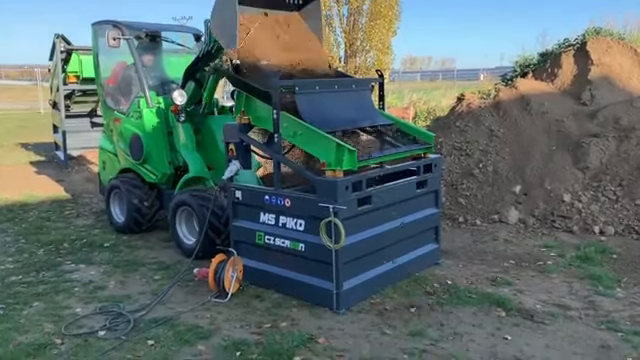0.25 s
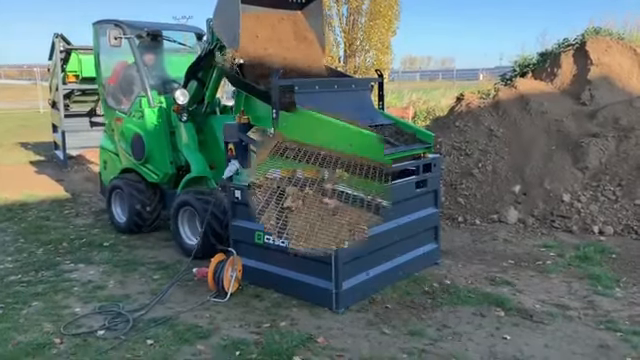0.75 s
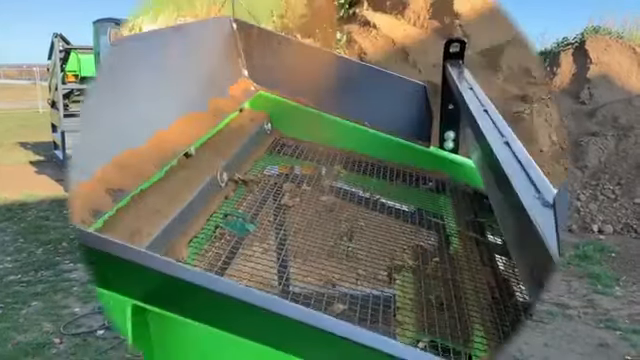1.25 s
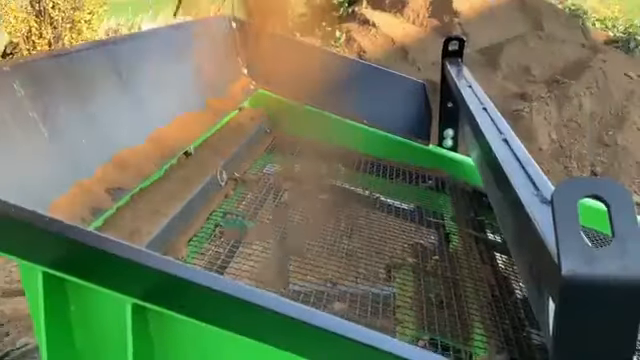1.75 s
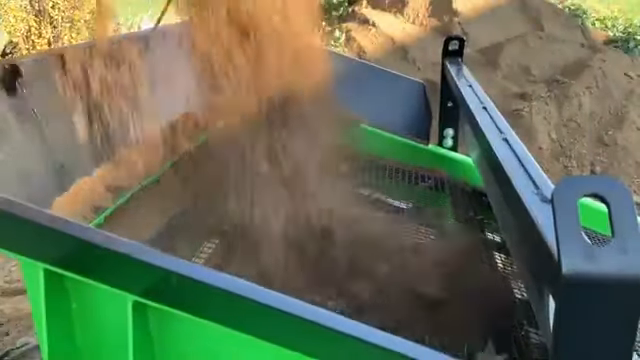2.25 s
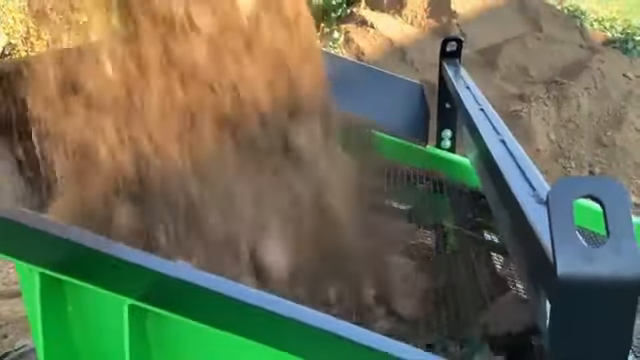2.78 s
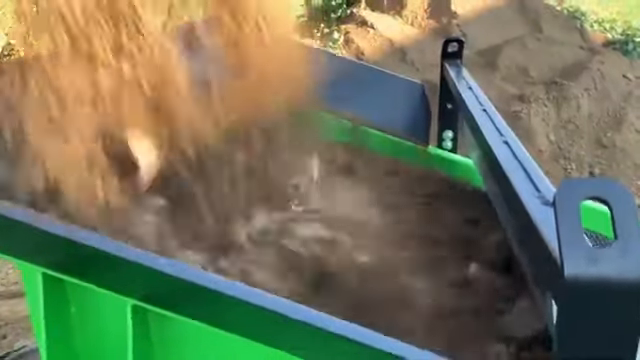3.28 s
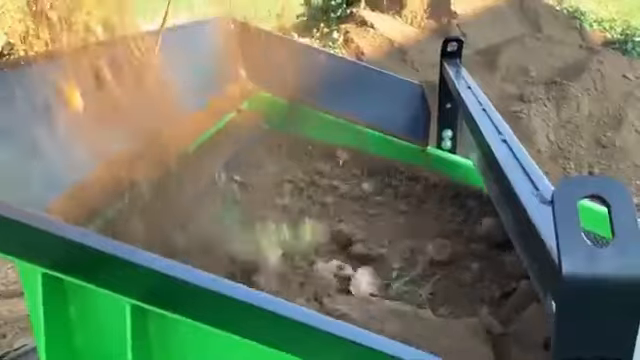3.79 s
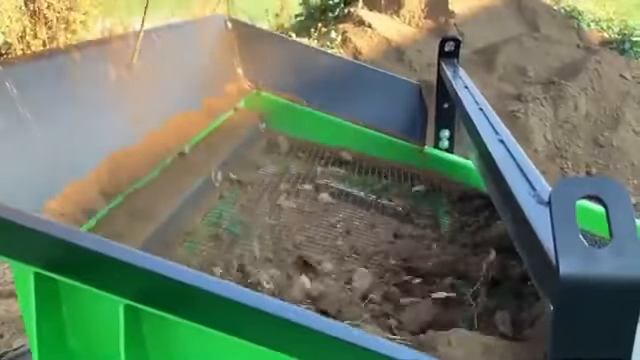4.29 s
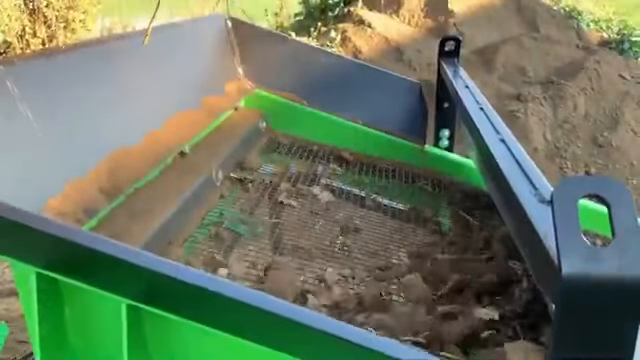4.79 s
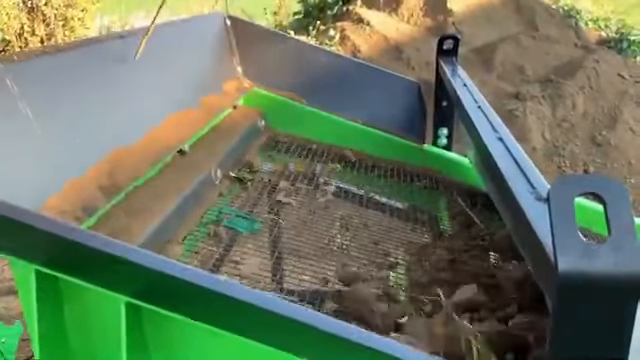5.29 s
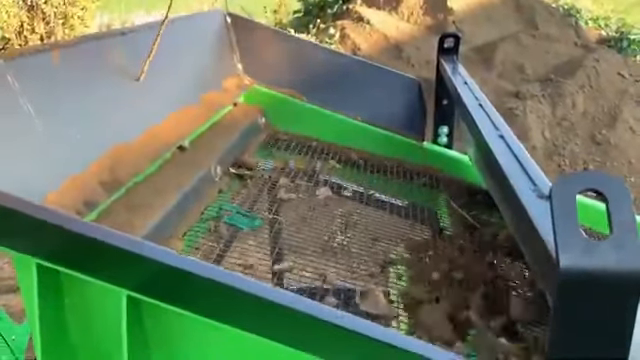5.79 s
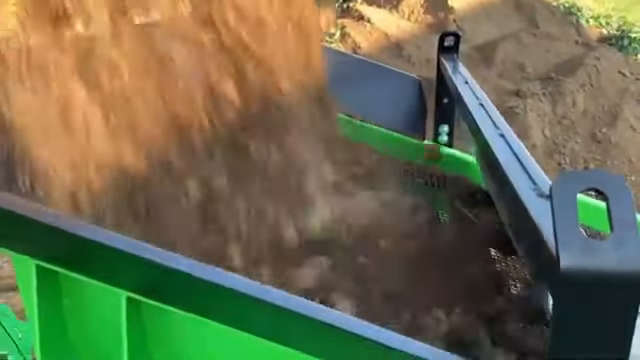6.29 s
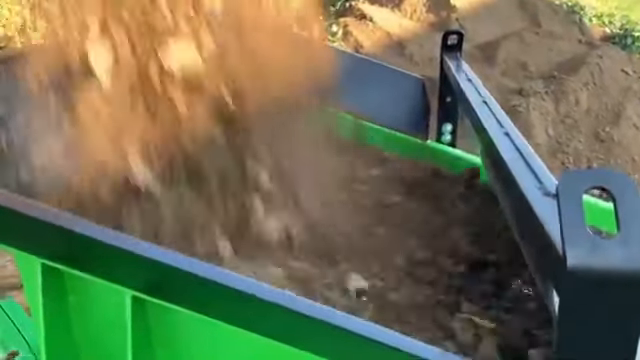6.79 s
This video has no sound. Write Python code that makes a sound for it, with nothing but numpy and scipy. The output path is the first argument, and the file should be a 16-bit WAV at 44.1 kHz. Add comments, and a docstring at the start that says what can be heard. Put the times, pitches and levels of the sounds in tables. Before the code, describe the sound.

Outdoors, a small diesel engine and a vibrating screen drone from a distance with a muffled clatter. The sound crossfades to a close, wide stereo view: stronger engine, fast shaker buzz, then a sharp stone crack as soil pours in a gritty rush. It thins to pebbles rattling on mesh, then a second load crashes down.

```python
"""A diesel drones across a field, then a close view fades in: soil pours and pebbles ring on a vibrating screen.
A compact loader's diesel drones beside it, built from orders of the engine cycle. A shaker motor throws the
load up over 24 times a second; shaped noise makes soil and rumble, decaying sines and resonances the ringing
pebbles and wires, noise bursts the stones and clods. Two microphone ports hear the treble a moment apart."""
import sys
import numpy as np
from scipy import signal
from scipy.fft import rfft, irfft
from scipy.io import wavfile
from scipy.ndimage import uniform_filter1d

SR = 44100
rng = np.random.default_rng(int(sys.argv[2]) if len(sys.argv) > 2 else 0)


def ratio_of_db(decibels):
    """Turn decibels (scalar or array-like) into linear amplitude factors; 0 dB maps to 1."""
    return 10 ** (np.asarray(decibels, float) / 20)


def to_wav(s):
    """Save 16-bit WAV."""
    ch = np.atleast_2d(s).T  # columns
    pcm = np.round(np.clip(ch, -1, 1) * 32767)  # PCM
    wavfile.write(sys.argv[1], SR, pcm.astype(np.int16))


N = 310905
T = np.arange(N) / SR
HZ = np.fft.rfftfreq(N, 1 / SR)


def unit(x):
    """Scaled to rms 1."""
    return x / np.sqrt(np.mean(x ** 2))


def columns(table):
    """Each column of a time table as a curve, straight between its rows."""
    time_s, *rest = np.transpose(table)
    return [np.interp(T, time_s, column) for column in rest]


def along(points):
    """A (Hz, value) table over all frequencies, straight on a log frequency scale."""
    hz, value = np.transpose(points)
    return np.interp(np.log(HZ + 1), np.log(hz), value)


def colour(x, points):
    """Filter by a table of (Hz, dB)."""
    return irfft(rfft(x) * ratio_of_db(along(points)), N)


def walk(rate):
    """Random levels held 1 / rate seconds and slewed twice; spread near 1."""
    hold = int(SR / rate)
    steps = np.repeat(rng.standard_normal(N // hold + 1), hold)
    return 1.3 * uniform_filter1d(uniform_filter1d(steps, hold), hold)[:N]


def fall(x, t60_s):
    """Every impulse becomes an exponential tail, 60 dB down after t60_s."""
    return signal.lfilter([1], [1, -np.exp(-np.log(1000) / (t60_s * SR))], x)


def grains(per_second, spread_db):
    """Random impacts, many small and few large."""
    chance, size = rng.random((2, N))
    size_db = np.minimum(-spread_db * np.log(1 - size), 3 * spread_db)
    return (chance < per_second / SR) * ratio_of_db(size_db)


def air():
    """Three unrelated noises: the direct path and two scattered ones."""
    return rng.standard_normal((3, N))


# likeness of the two microphone ports: hz, share (0-1)
PORT_LIKENESS = [(60, 0.92), (250, 0.82), (600, 0.91), (1200, 0.13), (1700, 0.3), (4000, 0.09),
                 (6000, 0.24), (7200, 0.77), (10500, 0.9), (11700, 1), (15000, 0.9)]
TREBLE_LAG_S, TURN_HZ = .000217, 6400


def ports(x, bass_lag_s, pan_db):
    """Row 0 is direct sound, reaching one port first; rows 1 and 2 are the scattered sound of left and right."""
    # below the turn the left port leads, above it the right; a positive pan favours the left
    lag_s = np.where(HZ < TURN_HZ, bass_lag_s, -TREBLE_LAG_S)
    like = np.clip(along(PORT_LIKENESS), 0, 1)
    side = np.array([[1], [-1]])
    direct, *scattered = rfft(x)
    arriving = np.sqrt(like) * direct * np.exp(1j * np.pi * HZ * lag_s * side)
    around = np.sqrt(1 - like) * np.array(scattered)
    return irfft(arriving + around, N) * ratio_of_db(side * pan_db / 2)


# how distance recolours the noise heard across the field: hz, gain_db
DISTANCE = [(100, 5), (200, -2.5), (500, 2), (1000, 9.5), (1500, 4), (3000, 6.5), (6000, 0.5),
            (10000, -1.5), (15000, -2)]


def across_field(noise):
    """Distance recolours the noise of the screen."""
    return colour(noise, DISTANCE)


def tone(hz, db):
    """A steady line that wavers a little in level and phase."""
    level = ratio_of_db(db + 1.5 * walk(18))
    phase = 2 * np.pi * np.cumsum(hz + 0 * T) / SR
    return np.sqrt(2) * level * np.cos(phase + 0.65 * walk(13))


# hum of the screen frame from afar: multiple of the shaker turn, level_db
FRAME_HUM = [(3, -39.5), (4, -56), (5, -40), (12, -41)]
FAR_SHAKE_HZ, FAR_THROW_S = 24.4, .041  # turns a second, time of one upward throw


def frame_hum():
    """The screen frame hums on multiples of the shaker turn."""
    return sum(tone(multiple * FAR_SHAKE_HZ, db) for multiple, db in FRAME_HUM)


# load on the engine lifts its upper orders: time_s, lift_db (in full from the 18th order up)
LOAD = [(1.2, 2), (2.75, -3.5), (3.3, -2), (4.7, 4.5), (5.3, 0.6), (7.05, 1.2)]


def engine(firing_hz, db, orders):
    """Orders of the four-stroke cycle, locked to the crank; load lifts the upper ones."""
    load_db, = columns(LOAD)
    cycle = 2 * np.pi * np.cumsum(firing_hz / 3) / SR  # three cylinders fire in each cycle
    out = 0
    for order, order_db, waver_db in orders:
        waver_db = min(waver_db, 1.8)
        lift_db = load_db * min(order / 3 - 1, 5) / 5
        level = ratio_of_db(order_db + waver_db * walk(14) + lift_db)
        # the exhaust pipe holds even multiples back further, which skews each pulse
        lag_rad = .8 if order % 2 else 1.9
        slip_rad = .08 * waver_db * walk(12)
        out = out + level * np.cos(order * cycle - lag_rad + slip_rad)
    return np.sqrt(2) * ratio_of_db(db) * out


# engine from across the field: time_s, firing rate (hz), level_db
FAR_ENGINE = [(0, 43.98, -21), (.25, 44.1, -21), (.37, 45, -25.5), (1.1, 44.3, -20.5)]
# its orders: multiple of the cycle, relative level_db, waver_db (1.8 at most is used)
FAR_ORDERS = [(3, -16, 2), (6, -0.5, -1), (9, -7, 3.5), (12, -17, 5.5), (15, -24, 3), (18, -21.5, 5)]


def far_engine():
    """The three-cylinder diesel drones on the orders of its cycle, every third being a firing multiple."""
    return engine(*columns(FAR_ENGINE), FAR_ORDERS)


# engine from close by: time_s, firing rate (hz)
NEAR_ENGINE = [(1.2, 55.64), (1.6, 55.2), (2.55, 55.67), (2.8, 56.06), (3.2, 55.6), (3.55, 56.37),
               (3.9, 55.3), (4.6, 55.28), (6.2, 55.3), (6.6, 55.45), (7.05, 55.8)]
# its orders: multiple of the cycle, relative level_db, waver_db (1.8 at most is used)
NEAR_ORDERS = [(3, 0, 0.096), (6, -5, 0.66), (9, -9.5, 1.84), (11, -18.5, 4.5), (12, -29, 3),
               (15, -25.5, 3), (18, -13.5, 1.9), (22, -26.5, 0.92), (27, -28, 3), (36, -26.5, 0.88)]
NEAR_ENGINE_DB = -17.5


def near_engine(firing_hz):
    """The diesel close by, with orders between the firing multiples too."""
    return engine(firing_hz, NEAR_ENGINE_DB, NEAR_ORDERS)


WHINE_PER_FIRING = 13.55
WHINE_ON_S, WHINE_RISE_S, WHINE_DB, WHINE_IDLE_DB = 5.47, 0.33, -38, -47


def pump_whine(firing_hz):
    """The hydraulic pump turns with the engine and whines louder as the bucket tips."""
    whine_db = np.interp(T, [WHINE_ON_S, WHINE_ON_S + WHINE_RISE_S], [WHINE_IDLE_DB, WHINE_DB])
    return tone(WHINE_PER_FIRING * firing_hz, whine_db)


# heaps landing at once: start_s, swell_db over the steady clatter (about 0.69 of it is reached)
HEAPS = [(1.49, 12), (5.4, 2), (6.17, 2)]
HEAP_RISE_S, HEAP_FALL_S = 0.06, .1


def heaps():
    """Each heap swells the clatter quickly and lets it die away, in dB."""
    out = 0
    for start_s, db in HEAPS:
        age = np.maximum(T - start_s, 0)
        out = out + db * 2 * (1 - np.exp(-age / HEAP_RISE_S)) * np.exp(-age / HEAP_FALL_S)
    return out


# two separate levels on the screen: time_s, soil pouring (control db), clods clattering (control db)
SOIL = [(0, -8.5, -11), (1.1, -14.5, -14), (1.5, -3.5, -5.5), (2.0, -1, 0), (2.2, 4.5, 3), (2.5, 4, 3.5),
        (2.85, 3, 1.5), (3.05, 0, -1.5), (3.8, -0.5, -1), (4.2, -4, 1), (4.8, -4, 1.5), (5.1, -9.5, 0.5),
        (5.95, -7, 0.5), (6.2, 5.5, 5.5), (6.6, 1.5, 1), (7.05, 0.5, 2)]


def soil_flow():
    """How strongly soil pours and clods clatter; each layer follows one of them by its own slope."""
    pour_db, clatter_db = columns(SOIL)
    return pour_db, clatter_db + heaps()


def throw(turn_hz, throw_s, sharpness):
    """How hard the load lands during each turn of the shaker, mean 1."""
    turn = (T - throw_s) * turn_hz % 1
    beat = np.exp(-turn * sharpness) * (1 - np.exp(-turn * 30))
    return beat / beat.mean()


# colour of the rumble: hz, db per Hz
RUMBLE = [(25, -28), (45, -7.5), (80, -2.5), (140, 0.5), (290, 0), (450, -12), (800, -17), (1500, -41.5)]
RUMBLE_DB, RUMBLE_SLOPE = -23, 0.51  # dB at rest, dB per dB of clatter


def rumble(clatter_db):
    """Low noise of engine and frame, wavering in level."""
    noise = colour(air(), RUMBLE) * ratio_of_db(0.88 * walk(16))
    return ratio_of_db(RUMBLE_DB + RUMBLE_SLOPE * clatter_db) * unit(noise)


# colours of pouring soil and of its dust: hz, db per Hz
HISS = [(1500, -12), (3000, 1), (4500, -1), (6500, -0.5), (8500, 0), (10500, -1.5), (11500, -9),
        (15500, -35)]
DUST = [(8000, -16), (11500, -13), (13000, 2), (15500, 2)]
HISS_DB, HISS_SLOPE = -35.5, 0.84  # dB at rest, dB per dB of pouring
DUST_DB, DUST_SLOPE = -44, 1.4


def hiss(pour_db, beat, lumps, sway_db, pings):
    """Soil pours on the mesh: noise swollen by the beat, lumps and grit; dust is its topmost treble."""
    grit = fall(grains(200 * beat, 3.), .02)
    power = 1.6 + 1.2 * beat + 0.042 * lumps ** 2 + 0.43 * grit ** 2
    noise = air() * np.sqrt(power) * ratio_of_db(sway_db + walk(18)) + ratio_of_db(-9) * pings
    soil = ratio_of_db(HISS_DB + HISS_SLOPE * pour_db) * unit(colour(noise, HISS))
    return soil + ratio_of_db(DUST_DB + DUST_SLOPE * pour_db) * unit(colour(noise, DUST))


# colour of thudding clods: hz, db per Hz
THUD = [(250, -16.5), (450, -2.5), (700, -7.5), (1000, -7.5), (1500, -20.5), (3000, -46.5)]
THUD_DB, THUD_SLOPE = -28, 1.21  # dB at rest, dB per dB of clatter


def thud(clatter_db, lumps, sway_db, pings):
    """Clods thud on the deck: dull noise that swells with each lump."""
    noise = air() * np.sqrt(1 + 0.13 * lumps ** 2) * ratio_of_db(0.13 * sway_db + 1.5 * walk(27))
    return ratio_of_db(THUD_DB + THUD_SLOPE * clatter_db) * unit(colour(noise + ratio_of_db(-2.5) * pings, THUD))


# resonances of wires and frame: pitch_hz, width_hz (30 at least is used), relative level_db
MESH = [(433, 25, -6), (665, 110, -6), (909, 25, 3), (1293, 49, 6), (1760, 93, -17), (2082, 14, 1.5),
        (2566, 80, 1), (3470, 190, 6.5), (4060, 110, -2)]


def mesh(knocks):
    """Each resonance of the mesh rung by its own share of the knocks."""
    out = 0
    for (hz, width_hz, db), knock in zip(MESH, knocks):
        pole = np.exp((2j * np.pi * hz - np.pi * max(width_hz, 30)) / SR)
        out = out + ratio_of_db(db) * signal.lfilter([1], [1, -pole], knock).imag
    return out


# colour of the rattling load: hz, db per Hz
RATTLE = [(500, -26), (1000, -12.5), (1330, 2.5), (1600, -1), (2200, -2), (2650, -5), (2850, -11.5),
          (5000, -14), (9000, -61)]
RATTLE_DB, RATTLE_SLOPE = -30.5, 1.04  # dB for the noise at rest, dB per dB of clatter


def rattle(clatter_db, beat, lumps, sway_db, pings):
    """The load rattles on the deck in time with the shaker, and its grains ring the wires."""
    power = 0.77 + 0.089 * beat + 0.043 * lumps ** 2
    noise = air() * np.sqrt(power) * ratio_of_db(sway_db + walk(22)) + ratio_of_db(-8.5) * pings
    wires = mesh([[grains(130 * beat, 2.) for _ in range(3)] for _ in MESH])
    deck = unit(colour(noise, RATTLE)) + ratio_of_db(-7) * unit(wires)
    return ratio_of_db(RATTLE_DB + RATTLE_SLOPE * clatter_db) * deck


def pebbles(beat, count):
    """Pebbles of all sizes ping on the wires, each at its own pitch, mostly as the deck throws them."""
    draw = rng.random((count, 7))
    out = np.zeros((3, N + SR))
    starts = np.searchsorted(np.cumsum(beat) / beat.sum(), draw[:, 0])
    for start, (_, pitch, ring, size, *turn) in zip(starts, draw):
        hz = 350 * 2 ** (5.2 * pitch)
        t60_s = (0.04 + 0.11 * ring) * (1000 / hz) ** 0.47  # higher pings die sooner
        age = np.arange(int(t60_s * 0.5 * SR)) / SR
        shape = (1 - np.exp(-age / 0.003)) * 1000 ** (-age / t60_s)
        gain = hz ** .7 * ratio_of_db(min(-3 * np.log(1 - size), 6))
        # each path has its own starting phase
        ping = np.sin(2 * np.pi * (hz * age + np.array(turn)[:, None]))
        out[:, start:start + len(age)] += gain * shape * ping
    return unit(out[:, :N])


def screen(beat):
    """The working screen: its layers draw on one set of lumps, pings and slow swaying."""
    pour_db, clatter_db = soil_flow()
    lumps = fall(grains(200 * beat, 2.), .05)
    sway_db = .5 * walk(9) + 1.1 * walk(20)
    pings = pebbles(beat, count=7000)
    return (rumble(clatter_db) + hiss(pour_db, beat, lumps, sway_db, pings)
            + thud(clatter_db, lumps, sway_db, pings) + rattle(clatter_db, beat, lumps, sway_db, pings))


# big clods: start_s, relative thump_db
CLODS = [(1.5148, -12), (1.5594, -17), (1.6534, -18), (2.069, -6.5), (2.795, -9), (4.2812, -30),
         (4.6533, -21), (5.431, -10), (5.819, -23), (6.1094, -18), (6.2101, -8), (6.2394, -18)]
CLOD_T60_S = 0.29


def clods():
    """Big clods thump slowly and dully, and knock the mesh."""
    thump, knocks = np.zeros(N), np.zeros((len(MESH), 3, N))
    shares = rng.standard_normal((len(CLODS), len(MESH), 3))
    for (start_s, thump_db), share in zip(CLODS, shares):
        age = np.maximum(T - start_s, 0)
        thump += ratio_of_db(thump_db) * (1 - np.exp(-age / 0.0039)) * 1000 ** (-age / CLOD_T60_S)
        knocks[:, :, int(start_s * SR)] = ratio_of_db(thump_db) * share
    return ratio_of_db(-11.0) * thump * unit(colour(air(), THUD)) + ratio_of_db(-20) * mesh(knocks)


# stones: start_s, relative crack_db, relative clack_db
STONES = [(0.1643, -30, -28), (0.2069, -27, -37), (0.547, -21, -43), (1.4084, -27, -42), (1.6534, -21, -24),
          (1.8143, -28, -22), (2.0415, -15, -15.5), (2.0583, -15, -13.5), (2.069, -4, -6.5),
          (2.16, -13, -27), (2.36, -12, -22), (2.4811, -12, -36), (2.592, -13, -39), (2.795, -12, -30),
          (3.3015, -2, -35), (3.691, -16, -37), (4.281, -22, -24), (4.6533, -20, -24), (4.772, -23, -25),
          (4.8084, -16.5, -30), (5.457, -18.5, -33), (5.6929, -28, -27), (5.819, -22.5, -24),
          (6.1093, -35, -26), (6.2101, -16, -26), (6.239, -19, -31), (6.8798, -31, -15.5),
          (6.9217, -16, -19)]
# colours of stone on steel, upper part and middle part: hz, db per Hz
CRACK = [(3000, -19), (5500, -8), (6500, -8), (8500, -4), (10500, -7.5), (13000, -19), (15500, -19)]
CLACK = [(600, -11), (1200, -4.5), (1800, 4), (2500, -0.5), (4000, -3), (6000, -7.5), (10000, -16)]
STONE_T60_S = 0.047


def stones():
    """Each stone strikes steel with a short burst of noise: a bright crack and a harder clack."""
    crack, clack = np.zeros(N), np.zeros(N)
    for start_s, crack_db, clack_db in STONES:
        age = np.maximum(T - start_s, 0)
        burst = (1 - np.exp(-age / 0.0027)) * 1000 ** (-age / STONE_T60_S)
        crack += ratio_of_db(crack_db) * burst
        clack += ratio_of_db(clack_db) * burst
    bright, hard = unit(colour(air(), CRACK)), unit(colour(air(), CLACK))
    return ratio_of_db(-6.5) * crack * bright + ratio_of_db(2) * clack * hard


DIP_START_S, DIP_END_S, DIP_DB, DIP_RETURN_S = 2.075, 2.97, -2, .1


def dip():
    """The whole sound drops just after a hard stone crack, holds, then eases back."""
    depth = np.clip(1 - (T - DIP_END_S) / DIP_RETURN_S, 0, 1)
    return ratio_of_db(DIP_DB * (T > DIP_START_S) * depth)


FADE_START_S, FADE_END_S, FAR_TONES_GONE_S = 0.89, 1.55, 1.23
NEAR_SHAKE_HZ, NEAR_THROW_S = 24.6, 4.808  # turns a second, time of one upward throw


def scene():
    """The view from across the field fades into the one close by."""
    near = np.clip((T - FADE_START_S) / (FADE_END_S - FADE_START_S), 0, 1)
    far_beat = throw(FAR_SHAKE_HZ, FAR_THROW_S, 3.6)
    near_beat = throw(NEAR_SHAKE_HZ, NEAR_THROW_S, 1.6)
    noise = screen((1 - near) * far_beat + near * near_beat) + clods() + stones()
    far_fade = np.interp(T, [FADE_START_S, FAR_TONES_GONE_S], [1, 0])
    far_tones = (far_engine() + frame_hum()) * far_fade
    firing_hz, = columns(NEAR_ENGINE)
    near_tones = (near_engine(firing_hz) + pump_whine(firing_hz)) * near
    # the noise crosses with equal power
    far_view = far_tones + across_field(np.sqrt(1 - near) * noise)
    near_view = near_tones + np.sqrt(near) * noise
    return (ports(far_view, .00003, -1.5) + ports(near_view, 0.00028, -0.8)) * dip()


def top_cut(x):
    """Nothing passes above the cut-off."""
    return signal.sosfilt(signal.butter(12, 15740, fs=SR, output="sos"), x)


def record(dry):
    """The loudest peaks are rounded off smoothly."""
    mix = np.tanh(0.83 * dry) / 0.82
    return top_cut(mix)


dry = scene()
out = record(dry)
to_wav(out)
```